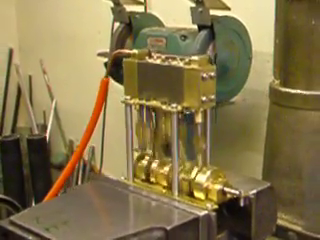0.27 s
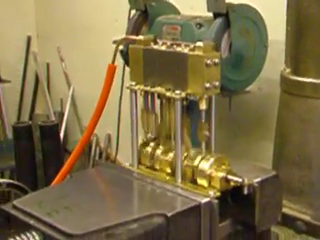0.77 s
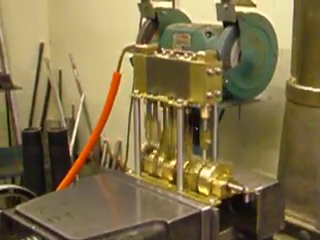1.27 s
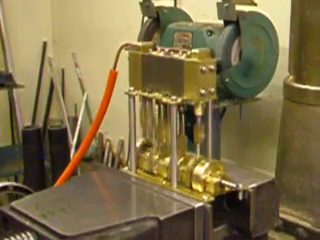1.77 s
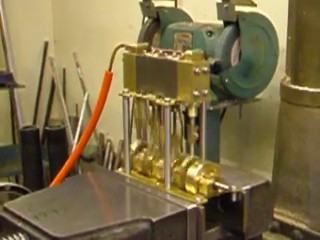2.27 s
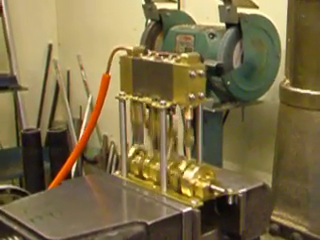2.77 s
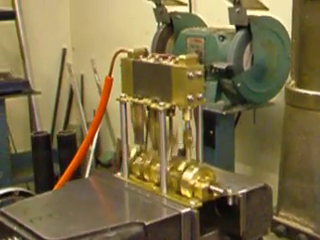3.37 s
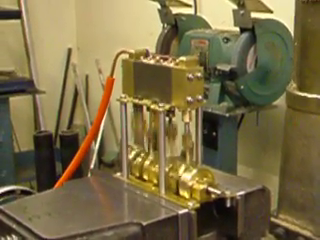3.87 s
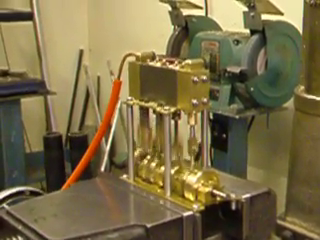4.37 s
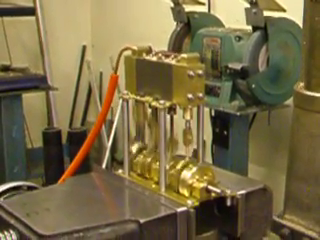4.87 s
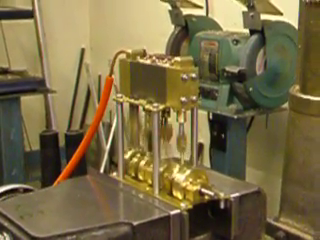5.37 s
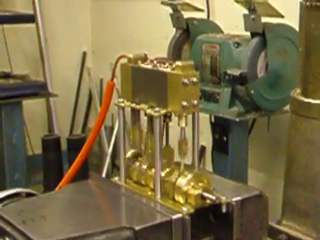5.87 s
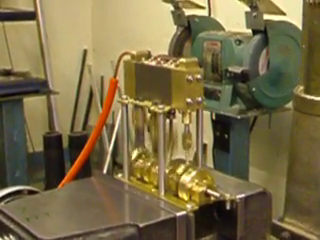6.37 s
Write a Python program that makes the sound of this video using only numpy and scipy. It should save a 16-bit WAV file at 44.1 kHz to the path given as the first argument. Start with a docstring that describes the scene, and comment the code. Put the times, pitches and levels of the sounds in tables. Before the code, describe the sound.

A small brass piston engine runs on compressed air on a workshop bench, chuffing quickly and evenly. Bright air hisses steadily from its joints, with an occasional tiny spit, while the rods knock softly underneath. About a second in, a soft hollow rub swells and fades, and two much fainter ones follow later. The engine sounds close, with short reflections over low room noise.

```python
"""A small brass piston engine chuffs on compressed air on a workshop bench, about 16 turns a second.
Air hisses steadily from its joints and now and then spits; exhausts and glands puff at fixed crank
angles, and the rods knock softly four times a turn, ringing the bed plate. Hard surfaces throw the
sound back over a bed of low room noise and thin tones. About a second in, a soft hollow rub swells
and fades; two fainter, duller ones follow."""
import sys
import numpy as np
from scipy import signal
from scipy.fft import rfft, irfft, next_fast_len
from scipy.io import wavfile

SR = 44100
rng = np.random.default_rng(int(sys.argv[2]) if len(sys.argv) > 2 else 0)


def pcm_store(signal):
    """Save signal as 16-bit PCM."""
    levels = np.round(np.clip(np.atleast_2d(signal), -1, 1) * 32767)
    wavfile.write(sys.argv[1], SR, levels.astype(np.int16).T)


N = 291059
TIME = np.arange(N) / SR

# colour of the workshop's room tone: (frequency [Hz], relative level [dB])
ROOM_TONE_COLOUR = [(15, -8), (30, 5.5), (45, -2), (110, 1), (200, 2), (320, 3.5), (400, -4.5), (700, -6),
                    (2000, -31.5)]
# decay of the workshop's reverb: (frequency [Hz], t60 [s])
ROOM_DECAY = [(200, 0.17), (2000, 0.45), (8000, 0.046)]
# thin steady tones of engine and workshop: (frequency [Hz], rms level [dB])
THIN_TONES = [(59.3, -84), (520, -75), (721.4, -71), (1077, -71.5), (1206, -74)]
# hollow body of every rub: (centre [Hz], width [Hz], relative level [dB])
RUB_RESONANCES = [(324, 90, 1.5), (824, 240, 2), (950, 800, -6.5)]
# soft rubs: (start [s], hold [s], level [dB], brightness [dB per octave])
RUB_CUES = [(0.8, 0.13, -49.5, -0.5), (2.65, 0.42, -64, -7), (4.45, 0.25, -65, -8)]
# crankshaft speed: (time [s], speed [turns per s])
CRANK_SPEED = [(0.0, 16.014), (0.6, 16.159), (1.2, 16.265), (1.8, 16.266), (2.4, 16.392), (3.0, 16.551),
               (3.6, 16.449), (4.2, 16.577), (4.8, 16.755), (5.4, 16.741), (6.0, 16.779), (6.6, 16.723)]
# the rods take up their play at each dead centre: (crank angle [turns], relative level [dB])
ROD_KNOCKS = [(.047, 2), (0.334, 1), (0.553, 0), (.797, -4)]
# ring of the bed plate and bench: (frequency [Hz], relative level [dB], t60 [s])
BED_MODES = [(130, -18.5, 0.028), (194, 2, 0.06), (246, 5.5, 0.041), (325, -7, 0.06), (515, -15.5, .06),
             (734, -10, .15), (800, -11.5, 0.07), (1046, -11.5, 0.19)]
# hard spits of air: (time [s], relative level [dB])
SPIT_CUES = [(0.4714, -16), (0.844, -14), (1.2124, -17), (1.4591, -16), (1.5209, -17), (2.0104, -18),
             (2.7434, -17), (4.4992, -20), (5.0355, -18), (6.4692, -17)]
# puffs in each turn: (opening angle [turns], rise [turns], level over leak [dB], centre [Hz], width [Hz])
PORT_PUFFS = [(0.122, 0.033, -1.3, 1410, 13990), (0.173, 0.016, 0, 7800, 9680),
              (0.358, 0.061, 0, 4050, 4470), (0.429, 0.0078, 0.5, 7640, 2990),
              (0.468, 0.019, 6, 6420, 1006), (0.575, 0.047, 2.5, 4540, 7470),
              (0.655, 0.019, 5.5, 1880, 1130), (0.82, 0.087, -1.7, 2970, 4650),
              (0.975, 0.034, 6, 8030, 1880)]
# broad colour of the air jets: (frequency [Hz], relative level [dB])
JET_COLOUR = [(100, -31.5), (300, -25), (560, -22.5), (1400, -24), (1750, -24.5), (2300, -9.5),
              (3100, -10.5), (4700, -10), (5600, -5), (6400, 0.0), (7200, -5), (7800, -6.5), (8500, -17),
              (8900, -34.5)]
# resonances of the ports, pipes and frame: (centre [Hz], width [Hz], boost [dB])
CAVITY_PEAKS = [(725, 28, 3.3), (816, 214, 5.2), (1078, 75, 8.0), (1202, 28, 5.9), (1579, 318, 8.5),
                (1792, 184, 10.0), (1875, 57, 6.6), (2064, 139, 5.6), (2623, 28, 2.4), (2693, 262, 5.2),
                (2822, 28, 3.6), (2944, 28, 2.4), (3386, 28, 3.3), (3599, 391, 7.7), (3785, 28, 1.8),
                (4267, 499, 7.8), (4607, 28, 3.5), (4972, 182, 8.0), (5117, 34, 5.7), (5191, 56, 5.8),
                (5313, 43, 5.4), (6068, 28, 3.1), (7548, 295, 3.4)]
# strength of the escaping air: (time [s], level [dB])
AIR_FLOW = [(0.03, -29.5), (0.06, -31), (0.51, -29), (2.45, -30), (3.44, -32), (5.73, -30.5), (5.82, -29.5),
            (5.9, -32.5), (6.0, -30), (6.07, -32.5), (6.38, -31), (6.42, -30.5), (6.45, -31.5), (6.47, -31)]


def gain_of(db):
    """Decibels to amplitude."""
    return 10 ** (np.asarray(db) / 20)


def unit_rms(x):
    """Scales to an rms of one."""
    return x / np.sqrt(np.mean(x ** 2) + 1e-20)


def automation(points):
    """A (time, value) curve, at every sample."""
    return np.interp(TIME, *np.transpose(points))


def spectrum_at(points, hz):
    """A (frequency, value) curve, joined on a log-frequency axis."""
    point_hz, value = np.transpose(points)
    return np.interp(np.log(hz + 1), np.log(point_hz), value)


def coloured(x, db_at, size=8192):
    """Minimum-phase EQ with a gain of db_at(hz): resonances ring after the push."""
    hz = abs(np.fft.fftfreq(size, 1 / SR))
    log_gain = np.log(gain_of(db_at(hz)))
    response = np.fft.ifft(np.exp(np.conj(signal.hilbert(log_gain)))).real
    return signal.oaconvolve(x, response[:size // 2])[:N]


def bell(hz, centre_hz, width_hz):
    """A resonance-shaped curve, one at its centre."""
    return 1 / (1 + (2 * (hz - centre_hz) / width_hz) ** 2)


def hiss(centre_hz, width_hz):
    """A soft-edged band of noise."""
    size = next_fast_len(N, real=True)
    band = bell(np.fft.rfftfreq(size, 1 / SR), centre_hz, width_hz)
    return irfft(rfft(rng.standard_normal(N), size) * band, size)[:N]


def wander(rate):
    """A random modulator of unit rms, gliding to a new value rate times a second."""
    return unit_rms(np.interp(TIME * rate, np.arange(8192), rng.standard_normal(8192)))


def room_tone(level_db=-66):
    """A low, even bed of workshop noise."""
    rumble = coloured(rng.standard_normal(N), lambda hz: spectrum_at(ROOM_TONE_COLOUR, hz))
    return gain_of(level_db) * unit_rms(rumble)


def room_reverb(x, wet_db=-14):
    """The workshop's short diffuse tail, each band dying at its own speed."""
    hz, t, noise = signal.stft(rng.standard_normal(SR // 2), SR, nperseg=256)
    decay = np.exp(-np.log(1000) * t / spectrum_at(ROOM_DECAY, hz)[:, None])
    tail = signal.istft(noise * decay, SR)[1]
    return gain_of(wet_db) * signal.oaconvolve(x, tail / np.linalg.norm(tail))[:N]


def near_echoes(x, echo_db=-24, first_s=0.001994, last_s=0.014, sway_s=0.00008, sway_rate=0.74, count=8):
    """Bench, wall and tools throw the sound back; the paths change as the listener sways."""
    out = np.zeros(N)
    for delay in rng.uniform(first_s, last_s, count):
        out += np.interp(TIME - delay - sway_s * wander(sway_rate), TIME, x, left=0)
    return gain_of(echo_db) * out


def thin_tones(swell_db=1.5, swell_rate=3, drift_hz=1.3, drift_rate=2):
    """Faint tones under the hiss, each wavering a little in level and pitch."""
    out = np.zeros(N)
    for hz, db in THIN_TONES:
        cycles = np.cumsum(hz + drift_hz * wander(drift_rate)) / SR
        swell = gain_of(swell_db * wander(swell_rate))
        out += gain_of(db) * unit_rms(swell * np.sin(2 * np.pi * cycles))
    return out


def rubs(attack_s=0.18, release_s=0.21, uneven_db=1.0, slip_rate=35):
    """Something slides softly: uneven friction noise in a few hollow resonances."""
    bands = [(hz, gain_of(db) * hiss(hz, width_hz)) for hz, width_hz, db in RUB_RESONANCES]
    out = np.zeros(N)
    for start, hold_s, db, brightness_db in RUB_CUES:
        corners = start + np.cumsum([0, attack_s, hold_s, release_s])
        envelope = np.interp(TIME, corners, [0, 1, 1, 0])
        body = sum(gain_of(brightness_db * np.log2(hz)) * band for hz, band in bands)
        out += gain_of(db) * envelope * unit_rms(body)
    return out * gain_of(uneven_db * wander(slip_rate))


def rod_knocks(turns, level_db=-65.0, uneven_db=0.4, jitter_s=0.00005):
    """The rods take up their play: four soft blows a turn ring the bed plate."""
    blows = np.zeros(N)
    for angle, db in ROD_KNOCKS:
        due_s = np.interp(np.arange(angle, turns[-1], 1), turns, TIME)
        late, softer = rng.standard_normal(size=(256, 2))[:len(due_s)].T
        hits = np.round((due_s + jitter_s * late) * SR).astype(int)
        blows[np.clip(hits, 0, N - 1)] = gain_of(db - uneven_db * softer)
    t = TIME[:SR // 4]
    ring = sum(gain_of(db) * np.exp(-np.log(1000) * t / t60) * np.sin(2 * np.pi * hz * t)
               for hz, db, t60 in BED_MODES)
    return gain_of(level_db) * unit_rms(signal.oaconvolve(blows, ring)[:N])


def spits(decay_s=0.0015, trim_db=-11.0, centre_hz=5200, width_hz=7500):
    """Now and then the air bursts through an oily gap: a sharp tick of noise."""
    triggers = np.zeros(N)
    for time_s, db in SPIT_CUES:
        triggers[round((time_s - decay_s / 2) * SR)] = gain_of(db + trim_db)
    envelope = signal.lfilter([1], [1, -np.exp(-1 / (decay_s * SR))], triggers)
    return envelope * hiss(centre_hz, width_hz)


def puffs(turns, uneven_db=1.5, sputter_db=2.5, sputter_rate=450, sputter_hz=8000):
    """Each port or gland opens once a turn: the jet rises fast and dies as the pressure drops."""
    out = np.zeros(N)
    for opens, rise, db, centre_hz, width_hz in PORT_PUFFS:
        count, angle = np.divmod(turns - opens + 1, 1)
        age = angle / rise
        envelope = np.sqrt(age * np.exp(1 - age))
        strength = gain_of(db + uneven_db * rng.standard_normal(256)[count.astype(int)])
        # the narrowest gaps hiss highest, and oil makes them sputter most
        sputter = gain_of(sputter_db * (centre_hz / sputter_hz) ** 2 * wander(sputter_rate))
        out += strength * sputter * envelope * hiss(centre_hz, width_hz)
    return out


def ports_db(hz):
    """The jet colour with the cavity resonances standing on it."""
    peaks_db = sum(db * bell(hz, centre_hz, width_hz) for centre_hz, width_hz, db in CAVITY_PEAKS)
    return spectrum_at(JET_COLOUR, hz) + peaks_db


def escaping_air(turns, flutter_db=0.52, flutter_rate=160, high_db=-1.33, low_db=-11.0, split_hz=3200,
                 fullness=0.46):
    """A steady leak, puffs and spits sound through the engine's cavities as one fluttering hiss."""
    leak = rng.standard_normal(N)
    jets = unit_rms((leak + puffs(turns)) * gain_of(flutter_db * wander(flutter_rate)))
    flow_db = automation(AIR_FLOW)
    flow = gain_of(flow_db)
    air = coloured(jets + spits() / flow, ports_db)  # dividing keeps the spits off the flow's fader
    low = signal.sosfiltfilt(signal.butter(4, split_hz, fs=SR, output="sos"), air)
    # stronger flow sounds fuller: the low band gains extra for each dB of flow over the mean
    body = gain_of(low_db + fullness * (flow_db - flow_db.mean())) * unit_rms(low)
    sizzle = gain_of(high_db) * unit_rms(air - low)
    return flow * (body + sizzle)


def scene():
    """The crank times both puffs and knocks; the engine sits over the workshop bed, in mono."""
    turns = np.cumsum(automation(CRANK_SPEED)) / SR
    engine = escaping_air(turns) + rod_knocks(turns)
    engine_in_room = engine + near_echoes(engine) + room_reverb(engine)
    return (engine_in_room + thin_tones() + room_tone() + rubs())[None]


def record(dry, cutoff_hz=8950, dc_offset=0.0034):
    """A steep high cut and a small steady offset on the mix."""
    low_pass = signal.firwin(401, cutoff_hz, window=("kaiser", 9), fs=SR)
    return signal.oaconvolve(dry, low_pass[None], "same") + dc_offset


dry = scene()
out = record(dry)
pcm_store(out)
```